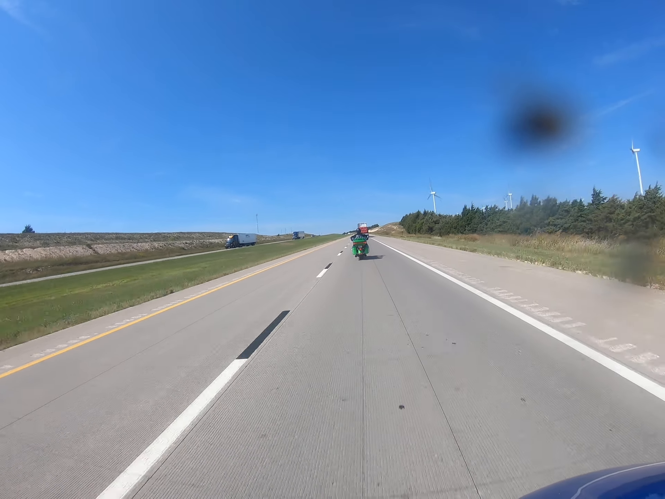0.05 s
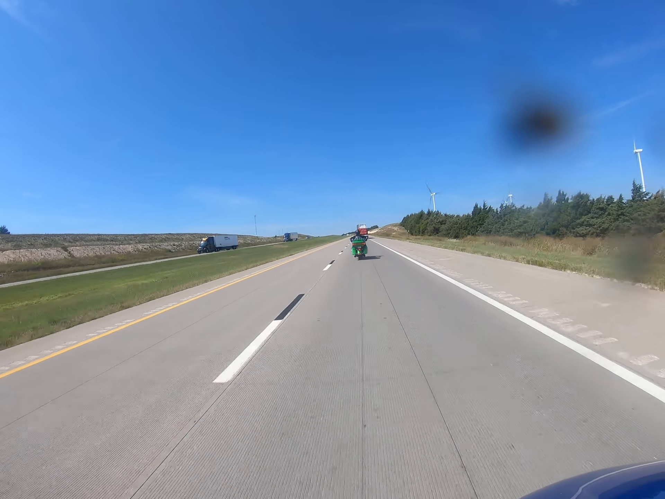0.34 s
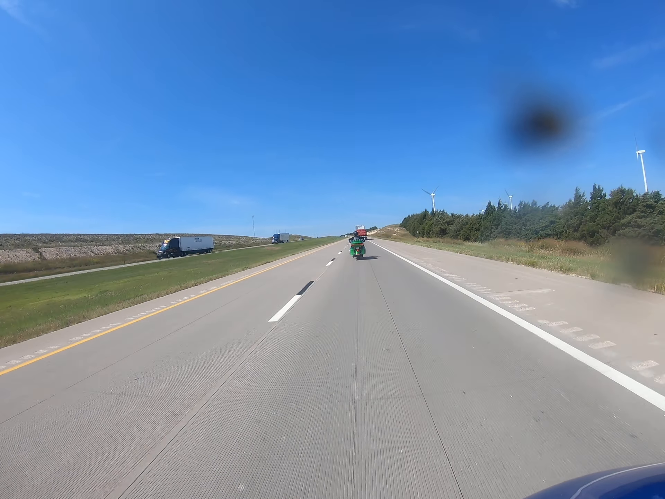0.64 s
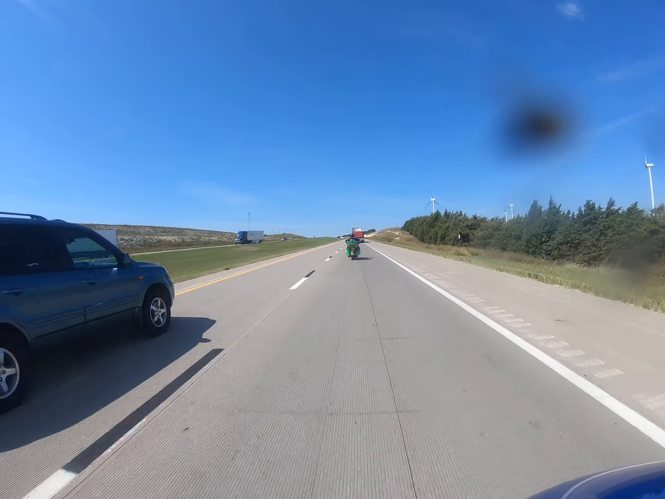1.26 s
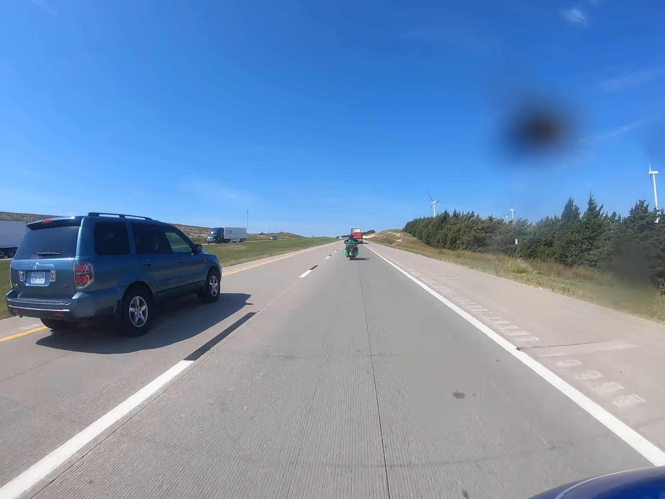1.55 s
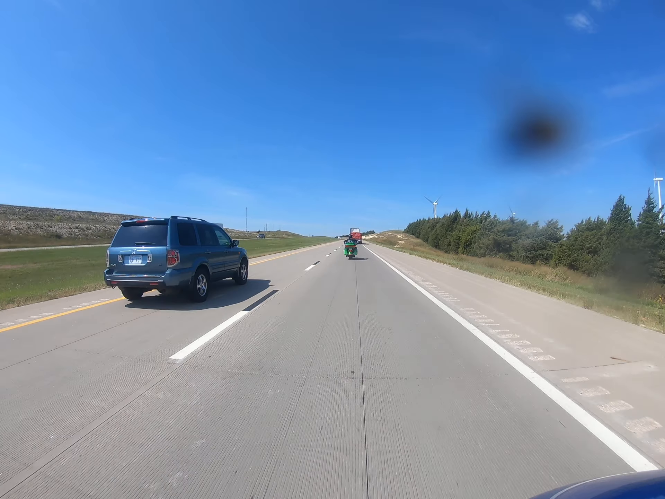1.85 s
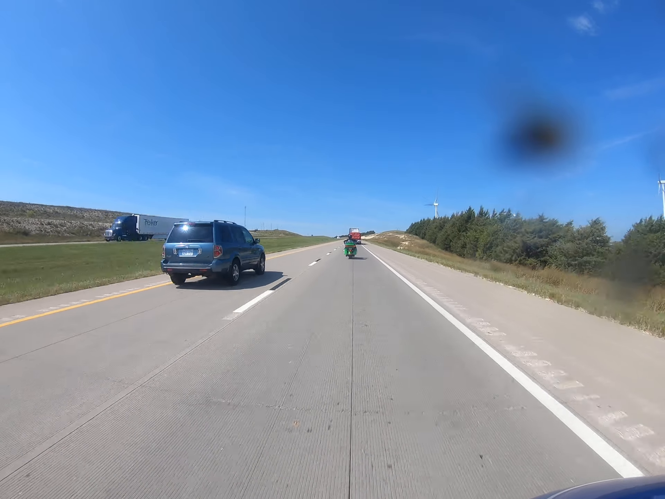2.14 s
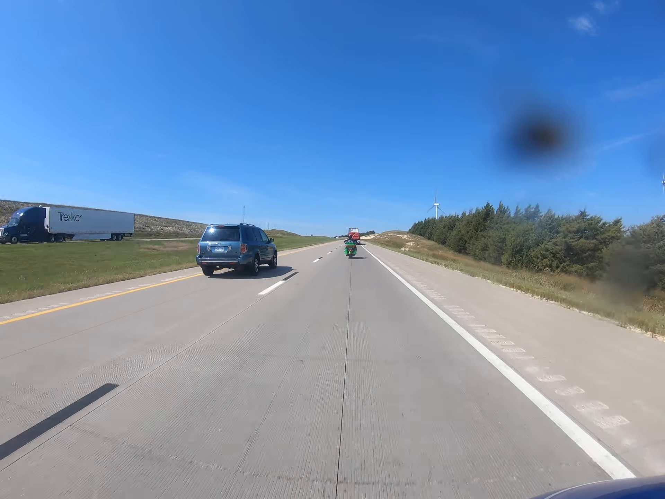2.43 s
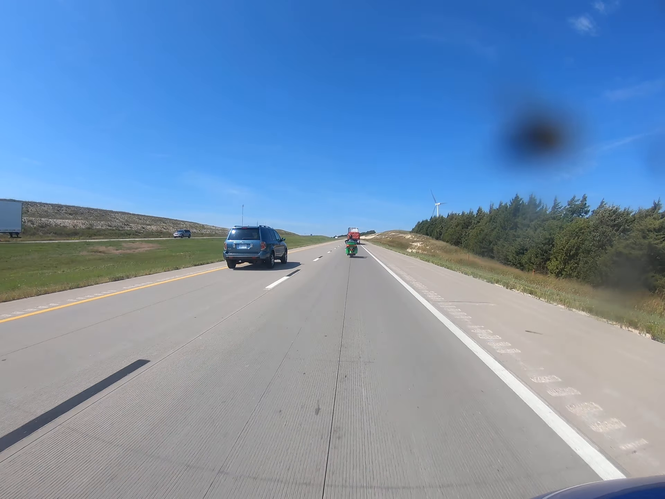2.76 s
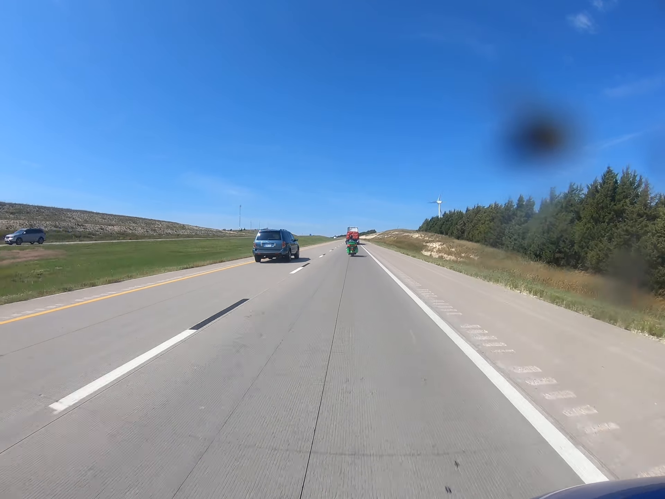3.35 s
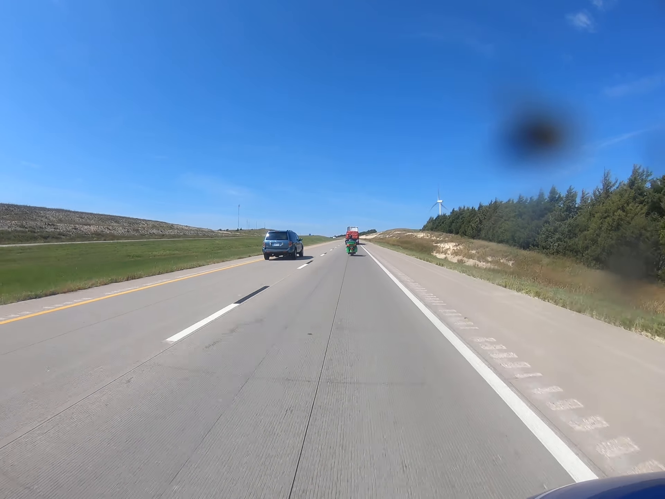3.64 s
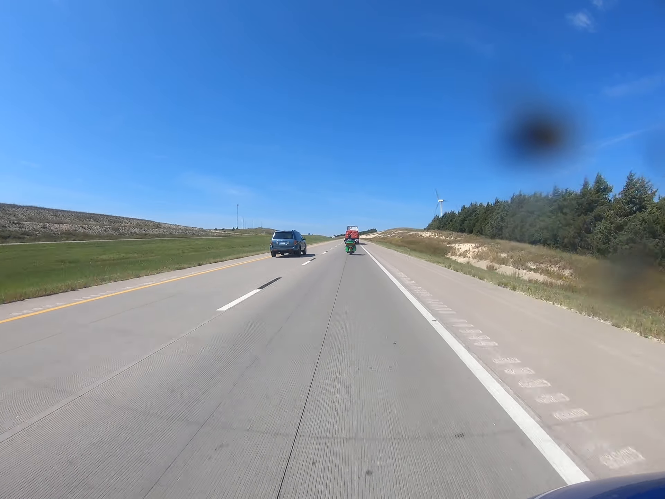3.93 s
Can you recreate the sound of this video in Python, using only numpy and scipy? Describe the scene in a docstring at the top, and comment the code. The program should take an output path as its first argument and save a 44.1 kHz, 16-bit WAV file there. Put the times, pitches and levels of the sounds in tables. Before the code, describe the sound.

A motorcycle engine throbs close up, slowly gaining speed on a highway. Wind buffets and hisses over the bike-mounted microphone above tyre roar. Midway, a car passes softly and faint, short exhaust cracks come from up the road.

```python
"""On a highway, microphone on a cruising twin-cylinder motorcycle that slowly gains speed.
Close up, the exhaust throbs, the drive hums and the wheels shudder in step with the engine.
Wind buffets, rushes round the bike and hisses over the microphone housing, above the roar of the tyres.
A car overtakes, and short cracks, likely the exhaust of a bike ahead, cut through.
The sound is mono, and a limiter holds down the peaks."""
import sys
import numpy as np
from scipy import signal
from scipy.fft import rfft, irfft
from scipy.io import wavfile
from scipy.ndimage import uniform_filter1d, minimum_filter1d

SR = 44100
rng = np.random.default_rng(int(sys.argv[2]) if len(sys.argv) > 2 else 0)


def unload_audio(sound):
    """Save the sound as a 16-bit wav file, at the path given as the first command line argument."""
    columns = np.transpose(np.atleast_2d(sound))
    # keep every value between -1 and 1, then stretch to whole-number steps
    steps = np.round(np.clip(columns, -1, 1) * 32767)
    wavfile.write(sys.argv[1], SR, steps.astype(np.int16))


N = 176400


def exhaust(cycle_angle):
    """The exhaust, close up: notes at multiples of the cycle rate; the silencer smears each firing."""
    # the two main notes: (time [s], level of 2nd multiple [dB], level of 3rd multiple [dB])
    throb = [(0, -16.5, -21), (.25, -26.5, -15.5), (.55, -23, -19.5), (.9, -17, -18.5), (1.25, -25, -17),
             (1.45, -13.5, -19), (1.7, -13.5, -25), (2.15, -18, -16), (2.6, -16, -24.5), (3.2, -14.5, -24),
             (4, -13.5, -25)]
    # weaker notes: (multiple of the cycle rate, level at mid-scene [dB], change [dB/s])
    overtones = [(1, -41.5, 9.5), (4, -24.5, .5), (5, -30.5, -4), (6, -37.5, 0.5), (7, -35, -1.5),
                 (8, -39.5, -1.5), (9, -42, 2), (10, -42, -1.5), (11, -46.5, -2), (12, -41.5, -2.5),
                 (13, -41, -1.5), (15, -44.5, -2.5), (16, -47.5, -2)]
    smear_rad = 1.55  # the silencer delays the higher notes more
    from_middle_s = (np.arange(N) - N / 2) / SR
    levels = list(enumerate(in_time(throb), 2))
    levels += [(round(k), db + slope * from_middle_s) for k, db, slope in overtones]
    return sum(note(k * cycle_angle - smear_rad * k * k, db, wobble_db=0.95) for k, db in levels)


def drivetrain(cycle_angle):
    """The drive hums and the wheels shudder twice a turn, both geared to the engine."""
    # (time [s], level [dB])
    hum_level = [(0, -50), (.6, -45.5), (.95, -45.5), (1.3, -32), (2, -29.5), (2.9, -34), (3.3, -32.5),
                 (4, -30)]
    hum = note(14.455 * cycle_angle, in_time(hum_level)[0], wobble_db=0.5)
    shudder = note(1.44 * cycle_angle, level_db=-29, wobble_db=6)
    return hum + shudder


def wind():
    """Eddies buffet the microphone, and air flows round the bike with a hollow rush."""
    # both: (frequency [Hz], relative density [dB])
    buffet_spectrum = [(12, -12.5), (21, -14), (29, -4.5), (55, 3.5), (75, -4), (110, -6.5), (160, -13.5),
                       (220, -17), (270, -13.5), (305, -13.5), (345, -19), (400, -31), (600, -43)]
    rush_spectrum = [(250, -16), (370, -1.5), (460, -3.5), (600, -6), (760, -13.5), (900, -22.5),
                     (1400, -28.5)]
    # (time [s], relative level [dB])
    rush_level = [(0.03, -40), (0.2, -43), (0.66, -37), (0.86, -39), (1.08, -36.5), (1.25, -40),
                  (1.55, -40), (1.7, -37), (2.05, -39.5), (2.2, -36), (2.55, -43.5), (2.8, -36.5),
                  (2.88, -41), (3.1, -38), (3.25, -39.7), (3.85, -41), (3.98, -37.5)]
    buffet = from_db(-20.5) * turbulence(buffet_spectrum, flutter_db=0.37)
    rush = from_db(in_time(rush_level)[0] + 0.5) * turbulence(rush_spectrum, flutter_db=1)
    return buffet + rush


def tyre_roar():
    """The tyres roar on the road just below the microphone."""
    # (frequency [Hz], relative density [dB])
    spectrum = [(650, -18), (880, -8), (1030, -3.5), (1140, -3), (1320, -5), (1470, -1), (1680, -3),
                (1860, -6.5), (2060, -3.5), (2230, -9.5), (2400, -9), (2750, -20.5), (3600, -43.5)]
    # (time [s], relative level [dB])
    level = [(0.03, -41), (.42, -40.5), (.52, -39), (0.63, -40.5), (.85, -37.5), (0.97, -36), (1.1, -39),
             (1.5, -37), (1.61, -42.5), (1.67, -37.5), (1.81, -37.5), (2.02, -40), (2.13, -35),
             (2.22, -35.5), (2.32, -38), (2.45, -40), (2.54, -38), (2.7, -40), (2.78, -35.5), (2.89, -39),
             (2.97, -37), (3.07, -39), (3.3, -40.5), (3.58, -38.5), (3.96, -40)]
    return from_db(in_time(level)[0] + 1) * turbulence(spectrum, flutter_db=1.5)


def exhaust_cracks():
    """Cracks from up the road: each rings for a few milliseconds in two midrange resonances."""
    # (time [s], relative level of lower ring [dB], relative level of upper ring [dB])
    cracks = [(0.944, -35, -35), (1.167, -44.5, -30.5), (1.415, -45, -33), (1.465, -40, -30.5),
              (1.574, -33.5, -37), (1.651, -28.5, -31.5), (1.697, -27, -38), (1.793, -32, -32),
              (1.857, -30, -39), (1.931, -33, -40), (2.168, -30, -41), (2.181, -43, -31), (2.243, -40, -33),
              (2.260, -27, -36), (2.306, -30, -31), (2.399, -41, -31), (2.434, -36, -38),
              (2.462, -29.5, -36), (2.495, -42, -36), (2.787, -32, -33), (2.956, -34, -35)]
    # (lower ring [Hz], upper ring [Hz])
    rings_hz = [1080, 1472]
    rise_s, detune = 0.00285, 0.023
    out = np.zeros(N + SR)
    age_s = np.arange(SR // 20) / SR
    envelope = age_s / rise_s * np.exp(1 - age_s / rise_s)
    for peak_s, *levels_db in cracks:
        start = int((peak_s - rise_s) * SR)
        for hz, db in zip(rings_hz, levels_db):
            pitch_hz = hz * (1 + detune * rng.standard_normal())
            ring = envelope * np.sin(2 * np.pi * pitch_hz * age_s)
            out[start:start + len(age_s)] += from_db(db + 1) * ring
    return out[:N]


def air_hiss():
    """Gusts hiss over the microphone housing, and air whistles faintly at an edge."""
    # both: (frequency [Hz], relative density [dB])
    hiss_spectrum = [(2000, -23), (2800, -11.5), (3000, -7), (3290, -1), (3650, -6.5), (3950, -8),
                     (4150, -8), (4280, -2.5), (4430, -6.5), (4660, 0.5), (5250, -3.5), (5950, -12.5),
                     (6600, -12), (7500, -23), (8110, -20), (8600, -27), (9100, -27), (9600, -31.5),
                     (10100, -34.5), (10600, -36.5), (13000, -50), (16000, -69)]
    whistle_spectrum = [(4100, -29.5), (4230, -1), (4285, 2.5), (4340, -6.5), (4440, -32)]
    # both: (time [s], level [dB])
    hiss_level = [(0.03, -51), (0.3, -51.5), (0.97, -46.5), (1.25, -50.5), (1.57, -46.5), (1.61, -54.5),
                  (1.69, -46), (1.83, -47), (2.07, -48.5), (2.18, -44.5), (2.35, -50), (2.5, -52.5),
                  (2.53, -47), (2.6, -53.5), (2.7, -50), (2.78, -47), (3.45, -49), (3.76, -46.5),
                  (3.82, -50), (3.97, -49)]
    whistle_level = [(0, -70), (.9, -61.5), (2.6, -77.5), (3.1, -57), (4, -60)]
    hiss = from_db(in_time(hiss_level)[0]) * turbulence(hiss_spectrum, flutter_db=0.5)
    whistle = from_db(in_time(whistle_level)[0]) * noise(whistle_spectrum)
    return hiss + whistle


def overtaking_car():
    """A car's tyre noise swells as it draws alongside and fades with distance."""
    # (frequency [Hz], relative density [dB])
    spectrum = [(800, -19.5), (1030, -2), (1140, -0.5), (1300, -9.5), (1480, -2.5), (1700, -10.5),
                (2200, -25.5)]
    nearest_s, spread_s = 1.65, 0.55
    relative_distance = np.hypot(1, (np.arange(N) / SR - nearest_s) / spread_s)
    return from_db(-41) / relative_distance * turbulence(spectrum, flutter_db=3)


def note(angle, level_db, wobble_db):
    """A partial around the given rms level, unsteady in phase and strength."""
    phase = angle + 0.1 * drift(rate_hz=7)
    return np.sqrt(2) * from_db(level_db + wobble_db * drift(rate_hz=7)) * np.sin(phase)


def turbulence(spectrum, flutter_db):
    """Coloured noise that flutters with quick eddies and sways with slower ones; rms 1."""
    steady = noise(spectrum)
    eddies_db = flutter_db * drift(rate_hz=87) + 0.52 * drift(rate_hz=8.8)
    return rms_one(steady * from_db(eddies_db))


def noise(spectrum):
    """Noise of the given colour, falling 36 dB an octave beyond its ends; rms 1."""
    hz, db = np.transpose(spectrum)
    bin_octaves = np.log2(np.arange(N // 2 + 1) * SR / N + 1)
    point_octaves = np.log2(hz)
    beyond = np.abs(bin_octaves - np.clip(bin_octaves, point_octaves[0], point_octaves[-1]))
    gain = from_db(np.interp(bin_octaves, point_octaves, db) - 36 * beyond)
    return rms_one(irfft(rfft(rng.standard_normal(N)) * gain, N))


def drift(rate_hz):
    """A smooth random wander, mostly slower than rate_hz; rms about 1."""
    hop, settle_steps = 40, 2000
    pole = np.exp(-2 * np.pi * rate_hz * hop / SR)
    white = rng.standard_normal(N // hop + settle_steps + 2)
    slow = signal.lfilter([1], [1, -2 * pole, pole * pole], white)[settle_steps:]
    return np.interp(np.arange(N) / hop, np.arange(len(slow)), rms_one(slow))


def in_time(rows):
    """The columns of a curve, one value per sample."""
    times_s, *columns = np.transpose(rows)
    return [np.interp(np.arange(N) / SR, times_s, column) for column in columns]


def from_db(db):
    """Decibels to gain."""
    return 10 ** (np.asarray(db) / 20)


def rms_one(x):
    """Scale to rms 1."""
    return x / np.sqrt(np.mean(x ** 2) + 1e-20)


def scene():
    """Everything at the one microphone on the bike."""
    # engine speed: (time [s], four-stroke cycle rate [Hz])
    engine_speed = [(0, 19.13), (1, 19.61), (2, 20.02), (3, 20.35), (4, 20.57)]
    cycle_angle = 2 * np.pi * np.cumsum(in_time(engine_speed)[0]) / SR
    bike = exhaust(cycle_angle) + drivetrain(cycle_angle)
    return (bike + wind() + tyre_roar() + exhaust_cracks() + air_hiss() + overtaking_car())[None]


def record(dry):
    """A fast look-ahead limiter ducks the whole sound on peaks; the top treble is cut."""
    threshold_db, release_db_per_s, ahead_s, stopband_hz = -7, 279.5, 0.0047, 13500
    over_db = np.maximum(20 * np.log10(np.abs(dry[0]) + 1e-9) - threshold_db, 0)
    fall_db = release_db_per_s * np.arange(N) / SR
    duck_db = np.maximum.accumulate(over_db + fall_db) - fall_db
    width = 2 * int(ahead_s * SR) + 1
    gain = from_db(uniform_filter1d(minimum_filter1d(-duck_db, width), width))
    lowpass = signal.cheby2(12, 70, stopband_hz, fs=SR, output="sos")
    return signal.sosfilt(lowpass, dry * gain)


dry = scene()
out = record(dry)
unload_audio(out)
```